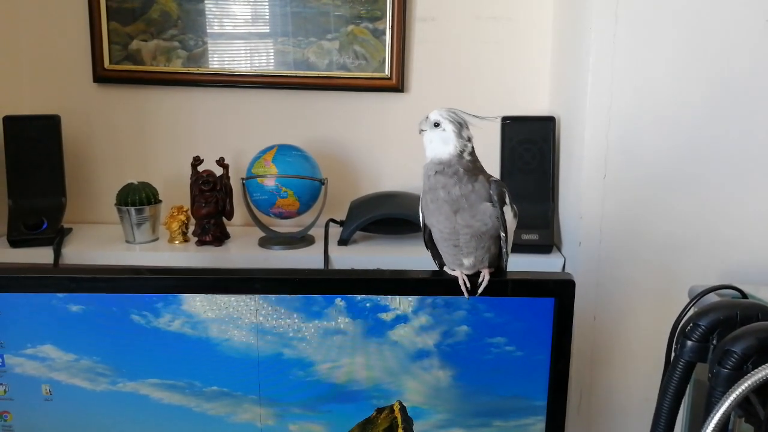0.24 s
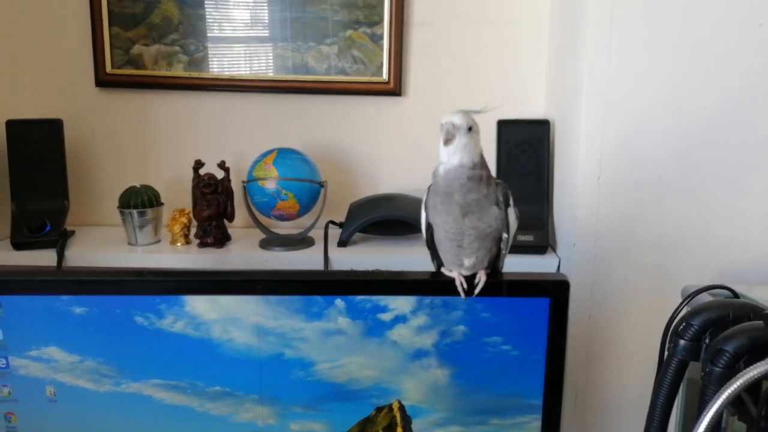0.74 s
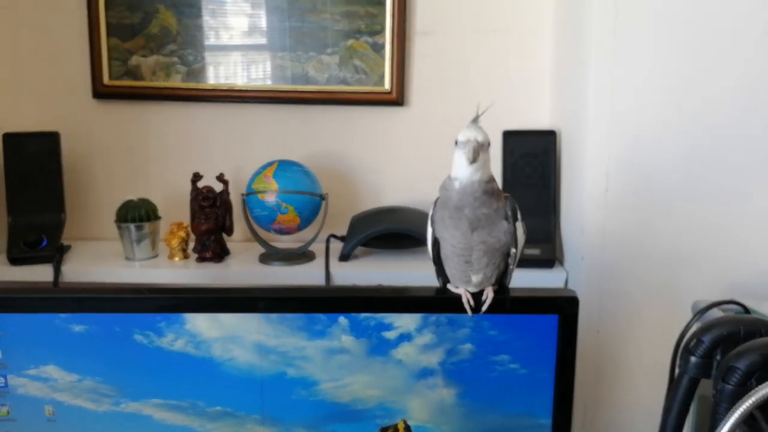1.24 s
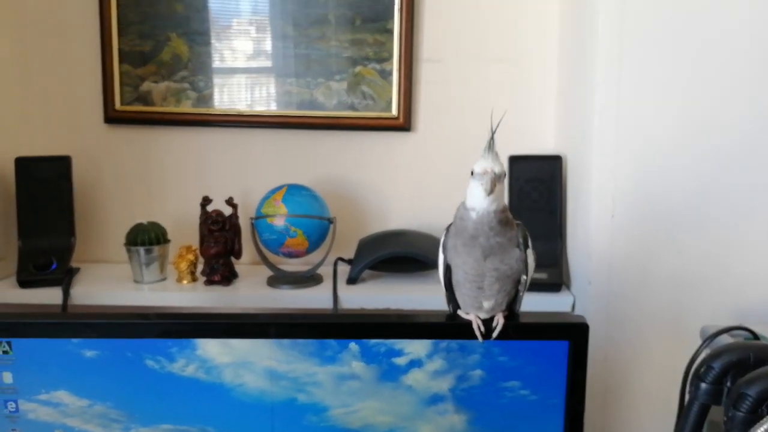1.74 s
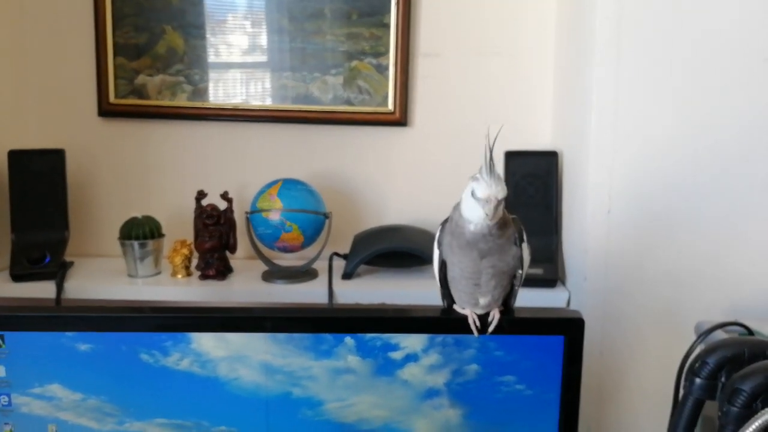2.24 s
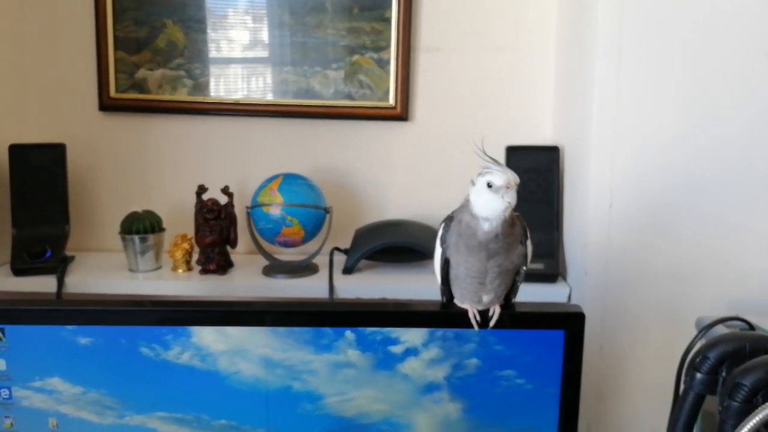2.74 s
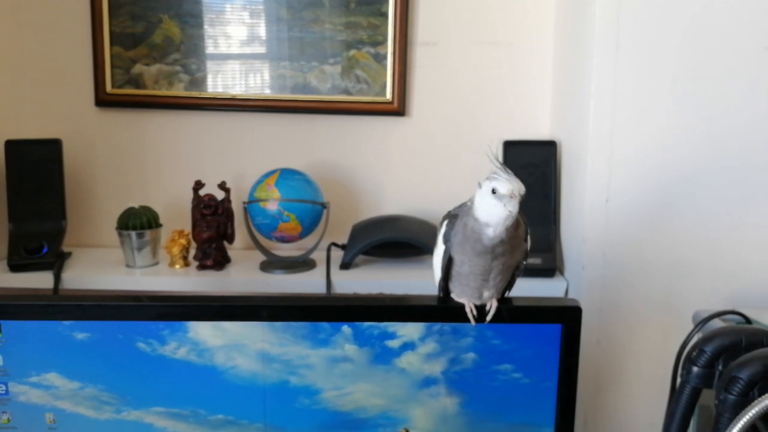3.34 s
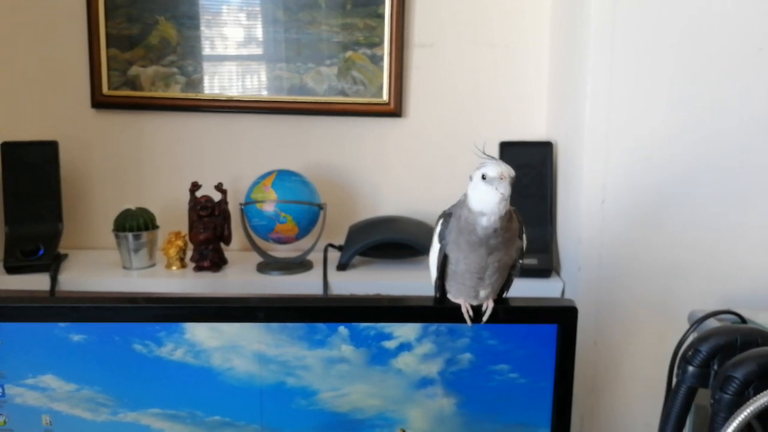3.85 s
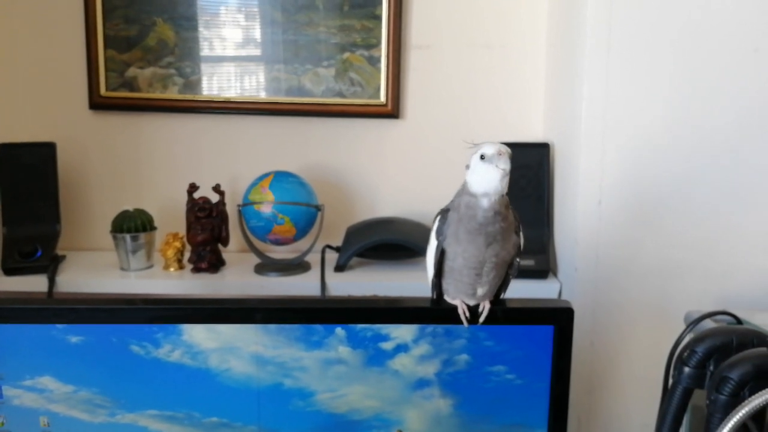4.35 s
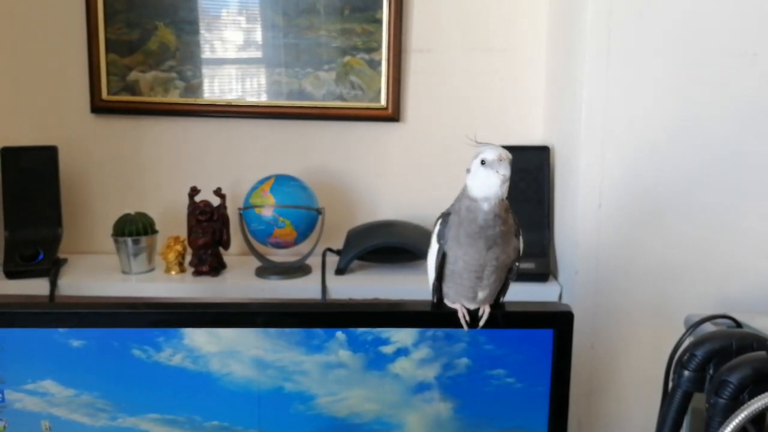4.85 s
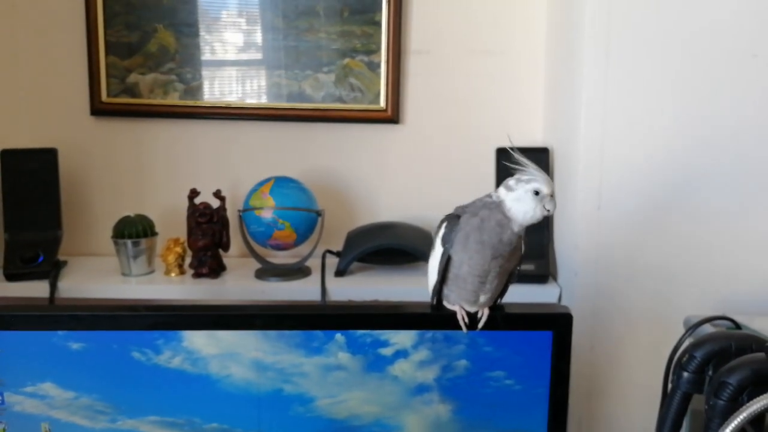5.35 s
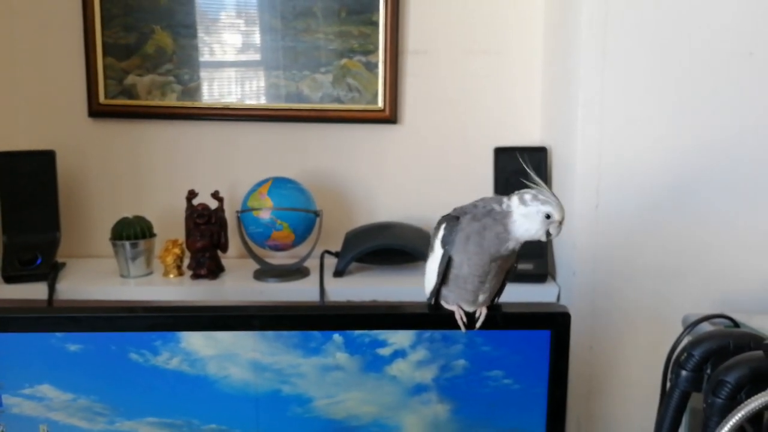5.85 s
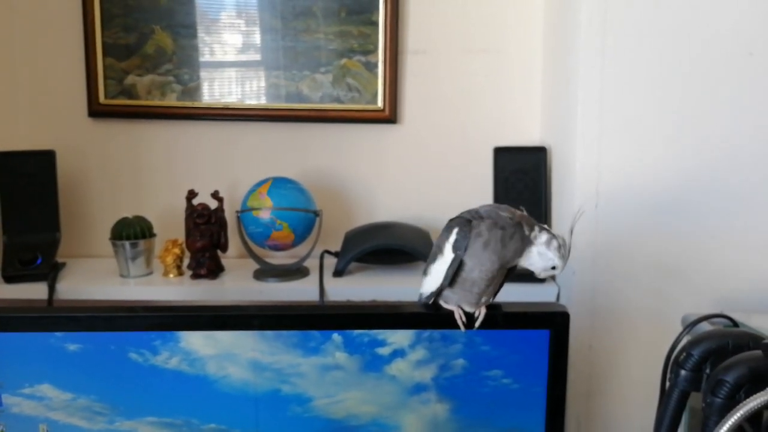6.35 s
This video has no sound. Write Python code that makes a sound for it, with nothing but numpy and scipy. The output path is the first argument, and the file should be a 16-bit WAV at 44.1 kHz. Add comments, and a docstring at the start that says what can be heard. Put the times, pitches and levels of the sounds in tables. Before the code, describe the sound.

A cockatiel sings in a small, quiet room with short, bright reflections, heard fairly close in stereo. At 0 s a falling slurred whistle, a chirp and a soft raspy note end a phrase already under way; from 0.4 to 0.7 s a long whistle climbs, swells purely and falls, followed by a husky, airy hiss until about 1.05 s. A pause leaves low mains hum, soft air, dull bumps and tiny dry rustles near 1.3 to 1.5 s. At 2.1 s a soft low call leads into loud bright cries at 2.4 s, then rapid chirps, hoarse notes and downward slurs until 4 s. Another long whistle at 4.1 to 4.4 s closes with a fading hiss to 4.8 s. The hum is thinner after 2.2 s. Quiet follows; a soft call at 5.5 s and cries from 5.8 s open a third phrase, chirping and slurring until the end around 6.6 s.

```python
"""A small, quiet room: a perched cockatiel ends one warbling phrase, sings a second and starts a third.
Each note is a gliding whistle with throat-coloured overtones, now pure, now bright or raspy.
A phrase closes with a husky hiss, noise in two throat resonances that rise and fall.
Echoes and a short tail answer; wavering sines hum, noise makes the air, dull swells and rustles."""
import sys
import numpy as np
from scipy import signal
from scipy.fft import rfft, irfft
from scipy.io import wavfile
from scipy.ndimage import uniform_filter1d, minimum_filter1d

SR = 44100
rng = np.random.default_rng(int(sys.argv[2]) if len(sys.argv) > 2 else 0)


def generate_wav(signal):
    """Clip the signal to [-1, 1] and save it as 16-bit WAV at the path in sys.argv[1]."""
    frames = np.transpose(np.atleast_2d(signal))
    scaled = np.clip(frames, -1, 1) * 32767
    pcm = np.round(scaled).astype(np.int16)
    wavfile.write(sys.argv[1], SR, pcm)


N = 291501

# jitter: rms share of the pitch; air: fizz relative to the overtones
HOARSE_JITTER, HOARSE_AIR_DB = 0.007, -12


def amp(db):
    """Decibels to gain."""
    return 10 ** (np.asarray(db) / 20)


def unit(x):
    """Scales to rms 1."""
    return x / np.sqrt(np.mean(x ** 2) + 1e-20)


def read(points, hz):
    """Every column of a spectrum table at the given frequencies, interpolated over log frequency."""
    f, *columns = np.transpose(points)
    return [np.interp(np.log(hz + 1), np.log(f), c) for c in columns]


def noise(colour, size=N):
    """Noise of rms 1 with the given spectrum."""
    db, = read(colour, np.fft.rfftfreq(size, 1 / SR))
    return unit(irfft(rfft(rng.standard_normal(size)) * amp(db), size))


def wobble(size, hz, order=4):
    """Random motion of rms 1, low-passed at hz."""
    lowpass = signal.butter(order, hz, fs=SR, output="sos")
    settled = signal.sosfilt(lowpass, rng.standard_normal(2 * size))[size:]
    return unit(settled)


def band(hz, width_hz, order):
    """Noise of about rms 1 that reaches width_hz to either side of the curve hz."""
    phase = 2 * np.pi * np.cumsum(hz) / SR
    in_phase = wobble(len(hz), width_hz, order) * np.cos(phase)
    return in_phase + wobble(len(hz), width_hz, order) * np.sin(phase)


def radiated(x, edge_hz):
    """High-pass: small things give off and throw back little below edge_hz."""
    return signal.sosfilt(signal.butter(3, edge_hz, "high", fs=SR, output="sos"), x)


def add(mix, start_s, sound):
    """Adds a sound into the mix at start_s."""
    part = mix[..., max(round(start_s * SR), 0):][..., :sound.shape[-1]]
    part += sound[..., :part.shape[-1]]


def background(hum_stop_s=2.19, apart=0.28, hum_side_db=1, air_db=-66.5, rush_db=4):
    """Slightly wavering mains hum, part of which dies away, over the still air of the room."""
    # hum lines: (frequency [Hz], steady peak level [dB], peak level of the share that stops [dB])
    hum_lines = [(49, -58.5, -66), (100, -68, -67), (149, -76, -84), (200, -69.5, -53), (300.5, -80, -61.5)]
    # spectrum of the air: (frequency [Hz], relative level per Hz [dB])
    air_colour = [(30, 2), (70, 1), (160, -2), (400, -8), (1800, -17), (4000, -26), (10500, -30),
                  (15000, -44)]
    t = np.arange(N) / SR
    running = np.clip((hum_stop_s - t) / 0.08 + 0.5, 0, 1)
    hum = np.zeros(N)
    for hz, steady_db, stopping_db in hum_lines:
        level = amp(steady_db) + running * amp(stopping_db)
        phase = 2 * np.pi * hz * t + 0.15 * wobble(N, 6)
        hum += level * (1 + 0.16 * wobble(N, 6)) * np.sin(phase)
    shared = noise(air_colour)
    air = np.array([unit(shared + apart * noise(air_colour)) for side in range(2)])
    # more air rushes while the louder hum runs
    return hum * amp([[hum_side_db], [-hum_side_db]]) + amp(air_db + rush_db * running) * air


def dull_swells(width_hz=190):
    """Soft, dull noise swells: a faint breathy murmur, an undertone below the first hiss, room noises."""
    # (start [s], length [s], centre [Hz], crest level [dB])
    swells = [(0.252, 0.22, 1000, -48.5), (0.883, 0.17, 1000, -52.5), (1.226, 0.18, 650, -55.5),
              (1.419, 0.28, 782, -65), (1.717, .13, 715, -59.5), (2.316, 0.12, 516, -58.5)]
    out = np.zeros(N)
    for start_s, length_s, hz, level_db in swells:
        window = signal.windows.hann(round(length_s * SR))
        add(out, start_s, amp(level_db) * window * band(np.full(len(window), hz), width_hz, order=3))
    return out


def ducking(x, threshold_db=-23, share=0.45, recovery_db_per_s=34):
    """Gain that drops as the 9 ms power of x grows loud, then recovers as a falling peak level."""
    power_db = 10 * np.log10(abs(uniform_filter1d(x ** 2, size=400)) + 1e-12)
    fall_db = np.arange(N) * recovery_db_per_s / SR
    held_db = np.maximum.accumulate(power_db + fall_db) - fall_db
    return amp(-share * np.maximum(held_db - threshold_db, 0))


def rustles():
    """Small dry puffs as the bird shifts on its perch: noise with a quick rise and exponential decay."""
    # (start [s], level before decay [dB], rise [s], decay [s])
    puffs = [(1.256, -54.5, 0.021, 0.057), (1.434, -49, 0.0017, 0.054)]
    # spectrum of the puffs: (frequency [Hz], relative level [dB])
    puff_colour = [(1100, -14), (1700, 0), (3500, -16), (4000, -2), (4400, -16), (14000, -40)]
    t = np.arange(N) / SR
    level = np.zeros(N)
    for start_s, level_db, rise_s, decay_s in puffs:
        rise = np.clip((t - start_s) / rise_s, 0, 1)
        level += amp(level_db) * rise * np.exp(-np.maximum(t - start_s - rise_s, 0) / decay_s)
    return level * noise(puff_colour)


def hiss(rows, low_width_hz=400, wide_hz=560, narrow_hz=280, high_db=-17, coupling_db=12,
         skirt_width_hz=2200, skirt_db=-22, gap_hz=3180, gap_width_hz=330):
    """Husky whistle: turbulence in two throat resonances that move with the beak, a still gap between."""
    s, *columns = np.transpose(rows)
    t = np.arange(s[0], s[-1], 1 / SR)
    level_db, low_hz, high_hz = (np.interp(t, s, c) for c in columns)
    # the upper resonance grows and narrows as its pitch falls towards the lower one
    nearness = (high_hz.max() - high_hz) / np.ptp(high_hz)
    upper = np.sqrt(1 - nearness) * band(high_hz, wide_hz, order=4)
    upper += np.sqrt(nearness) * band(high_hz, narrow_hz, order=4)
    air = band(low_hz, low_width_hz, order=6) + amp(high_db + coupling_db * nearness) * upper
    air += amp(skirt_db) * radiated(band(low_hz, skirt_width_hz, order=2), 1170)
    air = signal.lfilter(*signal.iirnotch(gap_hz, gap_hz / gap_width_hz, fs=SR), air)
    return amp(level_db) * air * signal.windows.tukey(len(t), 0.1)


def bend(u, first_hz, middle_hz, last_hz):
    """One smooth bend of pitch as u runs from 0 to 1."""
    line = first_hz + (last_hz - first_hz) * u
    return line + (2 * middle_hz - first_hz - last_hz) * 2 * u * (1 - u)


def swell(u, crest, edge_db):
    """Parabola in dB: 0 at the crest, edge_db half a note away."""
    return edge_db * (2 * (u - crest)) ** 2


def note(hz, level_db, overtone_db, rasp, doubling, jitter, tilt_db, air_db, rasp_jitter=0.15,
         rasp_hz=720, flutter_db=4.5, shake_db=10, fizz_db=-27, lower_half_db=-30,
         lurch_db=7, lurch_bend=0.07, lurch_hz=60, fits_db=1.2):
    """One whistle of the syrinx: a gliding tone, its overtones coloured by the throat and tilted per octave."""
    # throat and beak colour before the tilt: (frequency [Hz], level [dB])
    throat = [(2600, 18), (3200, 15.5), (3900, 7), (4700, 5.5), (5200, -1), (6000, 2.5), (6600, -7),
              (7400, -8), (8500, -14), (9700, -12), (11000, -20), (12400, -17), (14000, -29.5)]
    # breathy fizz: (frequency [Hz], relative level [dB])
    fizz_colour = [(1500, -4), (2800, 7), (4300, -5.5), (5400, -9), (6300, -8.5), (7500, -6), (8700, -16.5),
                   (10500, -15.5), (12000, -16), (14000, -20.5)]
    size = len(hz)
    t = np.arange(size) / SR
    tilted = [(f, db + tilt_db * np.log2(f / throat[0][0])) for f, db in throat]

    # the membranes beat less evenly when the voice rasps
    hz = hz * (1 + lurch_bend * rasp * wobble(size, lurch_hz))
    uneven = 1 + jitter * wobble(size, 150) + rasp_jitter * rasp * wobble(size, 400)
    phase = 2 * np.pi * np.cumsum(hz * uneven) / SR

    k = np.arange(2, 12)[:, None]
    weights = amp(read(tilted, k * hz)[0]) * (k * hz < SR / 2)
    overtones = (weights * np.sin(k * phase)).sum(0) / np.linalg.norm(weights, axis=0)
    overtones += amp(air_db) * noise(fizz_colour, size=size)
    tone = np.sin(phase) + amp(overtone_db + flutter_db * wobble(size, 75)) * overtones
    # strong and weak cycles alternate: half lines, the upper one louder
    tone += doubling * (0.5 * np.sin(1.5 * phase) + amp(lower_half_db) * np.sin(phase / 2))

    # uneven fits of chaotic cycles spread noise around each line and add fizz
    fits = rasp * unit(amp(fits_db * wobble(size, 240)))
    fizz = noise(fizz_colour, size=size) * signal.windows.tukey(size, 0.5)
    tone = tone * (1 + fits * wobble(size, rasp_hz)) + amp(fizz_db) * fits * fizz
    level_db = level_db + rasp * (shake_db * wobble(size, 190) + lurch_db * wobble(size, lurch_hz))
    gate = np.clip(np.minimum(t, t[-1] - t) / 0.004, 0, 1)  # 4 ms fades
    gated = tone * np.sin(np.pi / 2 * gate) ** 2
    return np.sqrt(2) * amp(level_db) * radiated(gated, 210)


def low_call(length_s, pitch_hz, level_db, overtone_db, catch=0.18, catch_s=0.0061, catch_db=4,
             sag_hz_per_s=700, waver=0.016, waver_hz=14, end_doubling=0.38):
    """A soft call that catches high, settles at once, wavers and sags; its cycles double more and more."""
    t = np.arange(0, length_s, 1 / SR)
    onset, u = np.exp(-t / catch_s), t / length_s
    motion = 1 + catch * onset - waver * np.sin(2 * np.pi * waver_hz * t)
    hz = pitch_hz * motion - sag_hz_per_s * t
    return note(hz, level_db + catch_db * onset + swell(u, crest=0.19, edge_db=0.5),
                overtone_db + swell(u, crest=0.58, edge_db=-8.5), rasp=0.025,
                doubling=end_doubling * u, jitter=0.004, tilt_db=0.5, air_db=-14)


def raspy(length_s, first_hz, middle_hz, last_hz, level_db, overtone_db, rasp, doubling):
    """A hoarse note that bends around one pitch, brightest past its middle."""
    u = np.linspace(0, 1, round(length_s * SR))
    return note(bend(u, first_hz, middle_hz, last_hz), level_db + swell(u, crest=0.46, edge_db=-0.5),
                overtone_db + swell(u, crest=0.62, edge_db=-11), rasp, doubling,
                HOARSE_JITTER, tilt_db=2.5, air_db=HOARSE_AIR_DB)


def slur(length_s, high_hz, low_hz, tip_after_s, tip_s, level_db, overtone_db, rasp, steady_share=0.25):
    """A held high pitch tips over into a low one, and the voice breaks up as it does."""
    u = np.linspace(0, 1, round(length_s * SR))
    tipped = 0.5 + 0.5 * np.tanh((u * length_s - tip_after_s) / (2 * tip_s))
    rasp = rasp * (steady_share + (1 - steady_share) * np.sqrt(tipped))
    hz = high_hz + (low_hz - high_hz) * tipped
    return note(hz, level_db + swell(u, crest=0.4, edge_db=-1.5), overtone_db, rasp,
                doubling=0.12, jitter=HOARSE_JITTER, tilt_db=-5.0, air_db=HOARSE_AIR_DB)


def chirp(length_s, first_hz, middle_hz, last_hz, level_db, overtone_db,
          brighten_db=5, end_rasp=0.26, flick=0.027, flick_s=0.0034):
    """A short glide that brightens as it goes and stops with a rough downward flick."""
    u = np.linspace(0, 1, round(length_s * SR))
    ending = np.exp((u - 1) * length_s / flick_s)
    hz = bend(u, first_hz, middle_hz, last_hz) * (1 - flick * ending)
    return note(hz, level_db + swell(u, crest=0.51, edge_db=-6.5), overtone_db + brighten_db * (u - 0.5),
                rasp=0.0072 + end_rasp * ending, doubling=0, jitter=0.007, tilt_db=1.5, air_db=-16)


def cry(length_s, first_hz, middle_hz, last_hz, level_db, overtone_db,
        drop=0.15, drop_s=0.0055, clean_rasp=0.005, end_rasp=0.13):
    """A bright arch that drops and frays as the push ends; the fundamental swells more than the overtones."""
    u = np.linspace(0, 1, round(length_s * SR))
    ending = np.exp((u - 1) * length_s / drop_s)
    hz = bend(u, first_hz, middle_hz, last_hz) * (1 - drop * ending)
    body_db = swell(u, crest=0.5, edge_db=-14.0)
    shine_db = swell(u, crest=0.27, edge_db=2.0)
    return note(hz, level_db + body_db, overtone_db + shine_db - body_db, clean_rasp + end_rasp * ending,
                doubling=0, jitter=0.0019, tilt_db=-1.13, air_db=-41.5)


def whistle(rows, crack=0.18, crack_s=0.079):
    """The long whistle and its left-right balance; the voice cracks into period doubling as it dies."""
    s, *columns = np.transpose(rows)
    t = np.arange(s[0], s[-1], 1 / SR)
    hz, level_db, overtone_db, rasp, side_db = (np.interp(t, s, c) for c in columns)
    doubling = crack * np.clip(2 * (t - s[-1] + crack_s) / crack_s, 0, 1)
    sound = note(hz, level_db, overtone_db, rasp, doubling, jitter=0.001, tilt_db=1.0, air_db=-22.5)
    return sound, side_db


def song():
    """Every note as (start s, sound, left minus right dB, which shifts with the reflections near the perch)."""
    # Levels are bases for the swells; overtones are relative to the fundamental; side is left minus right.
    # loud, bright cries that open a phrase: (start [s], length [s], first [Hz], middle [Hz], last [Hz],
    # level [dB], overtones [dB], side [dB])
    cries = [(2.397, 0.1, 1738, 1999, 1952, -13.5, -12.5, 4.5),
             (2.539, 0.056, 1920, 2371, 2382, -12.5, -10, -1.5),
             (2.659, 0.042, 1687, 1823, 1765, -23, -3.5, 6.5),
             (5.832, 0.11, 1757, 2016, 1795, -15.5, -11, 9.5),
             (5.972, .058, 1821, 2248, 2232, -14, -8.5, 1), (6.089, 0.045, 1556, 1807, 1584, -22, -8, 8.5)]
    # short, nearly pure chirps: columns as the cries
    chirps = [(0.118, 0.038, 1633, 1578, 1512, -19.5, -21.5, -3),
              (2.778, 0.046, 1396, 1587, 1703, -20.5, -21, 5.5),
              (3.171, 0.037, 1557, 1572, 1482, -19, -28, 7), (3.285, 0.044, 1470, 1635, 1573, -18, -26, 8),
              (3.418, 0.043, 1472, 1696, 2190, -18.5, -24, 7.5),
              (3.827, 0.041, 1578, 1618, 1689, -17, -19.5, 7),
              (3.935, 0.047, 1369, 1402, 1340, -23.5, -18, 1.5),
              (6.211, 0.047, 1363, 1654, 1788, -20, -27, 2.5)]
    # raspy notes around one pitch: (start [s], length [s], first [Hz], middle [Hz], last [Hz],
    # level [dB], overtones [dB], rasp [0-1], period doubling [0-1], side [dB])
    rasps = [(0.244, 0.044, 1391, 1378, 1394, -33, -15.5, 0.2, 0.44, -4),
             (2.921, 0.082, 1966, 1862, 2030, -25, -24, .16, 0, 1.5),
             (3.562, .091, 1933, 1707, 1954, -25.5, -21.5, 0.14, 0.4, 4.5),
             (6.36, 0.091, 2202, 2226, 2160, -26.5, -26, 0.3, 0, -1)]
    # slurs from high to low: (start [s], length [s], high [Hz], low [Hz], tips after [s], tipping time [s],
    # level [dB], overtones [dB], rasp [0-1], side [dB])
    slurs = [(0, .046, 2560, 1890, 0.037, 0.0016, -18, -26.5, 0.23, 5),
             (3.046, 0.071, 2440, 1515, 0.036, 0.0079, -28.5, -26.5, 0.21, 0.5),
             (3.7, .071, 2210, 1538, 0.029, 0.012, -22.5, -26.5, 0.08, 4.5),
             (6.51, 0.061, 2430, 1645, 0.02, 0.0049, -22, -22.5, 0.05, 1)]
    # soft calls that announce a phrase: (start [s], length [s], pitch [Hz], level [dB], overtones [dB],
    # side [dB])
    low_calls = [(2.101, .108, 1334, -35, -14.5, 2), (5.537, .131, 1352, -33, -16, 4)]
    # long whistles, a raspy climb, a pure swell and a fall: (time [s], pitch [Hz], level [dB],
    # overtones [dB], rasp [0-1], side [dB])
    whistles = [
        [(.364, 1311, -31, -16, 0.19, -5), (.396, 1355, -27, -22, 0.01, -5.5),
         (.437, 1700, -21.5, -23, 0.15, 7), (.457, 2000, -24, -29, 0.13, 2.5), (.503, 1946, -23, -34.5, .08, 6),
         (.547, 1919, -10, -36, 0, 16.5), (.603, 1947, -11.5, -33.5, 0, 10), (.63, 1842, -28.5, -14, 0, -1.5),
         (.687, 1506, -20.5, -24, 0.02, 2.5)],
        [(4.072, 1286, -32, -14, 0.07, -4.5), (4.125, 1583, -19, -31, 0, 6), (4.157, 2022, -22.5, -24, 0.13, 1),
         (4.184, 1793, -32, -41, 0.4, 1.5), (4.213, 1755, -29, -17.5, 0.11, 1.5),
         (4.257, 1877, -10, -32, 0, 11.5), (4.306, 2016, -18.5, -26.5, 0, -2.5),
         (4.334, 1804, -32, -25, 0.18, 0.5), (4.377, 1194, -33.5, -7, 0.09, -1)],
    ]
    kinds = [(low_call, low_calls), (raspy, rasps), (slur, slurs), (chirp, chirps), (cry, cries)]
    notes = []
    for sing, table in kinds:
        for start_s, *shape, side_db in table:
            notes.append((start_s, sing(*shape), side_db))
    for rows in whistles:
        notes.append((rows[0][0], *whistle(rows)))
    return notes


def shelf(x, edge_hz=2200):
    """Shelf and wall behind the perch throw the overtones back, a little differently to each ear."""
    # first echoes: (delay to the left ear [s], delay to the right ear [s], level [dB])
    echoes = [(.0003, 0.0005, -14.5), (.0024, .0019, -14.5), (.0058, 0.0054, -11.5)]
    bright, out = radiated(x, edge_hz), np.zeros((2, N))
    for left_s, right_s, level_db in echoes:
        add(out[0], left_s, amp(level_db) * bright)
        add(out[1], right_s, amp(level_db) * bright)
    return out


def room(x, first_s=0.011, taps_per_s=4000):
    """Dense reflections of random sign, other ones for each ear, each band dying at its own speed."""
    # the tail: (frequency [Hz], total level [dB], time to fall 60 dB [s])
    tail_bands = [(1800, -7, 0.35), (2660, -6, 0.46), (3550, -6, 0.45), (5430, -10, 0.46),
                  (13000, -3, 0.06)]
    signs = rng.choice([-1., 1.], (2, SR))
    taps = signs * (rng.random((2, SR)) < taps_per_s / SR) * (np.arange(SR) > first_s * SR)
    hz, t, z = signal.stft(taps / np.linalg.norm(taps[0]), SR, nperseg=256)
    level_db, t60_s = (c[:, None] for c in read(tail_bands, hz))
    decay = np.log(1000) / t60_s
    # sqrt(2 * decay) keeps a band's energy independent of its decay time
    envelope = amp(level_db) * np.sqrt(2 * decay) * np.exp(-decay * t)
    tail = signal.istft(z * envelope, SR)[1]
    return signal.fftconvolve(x[None], tail, axes=1)[:, :N]


def scene():
    """The bird with its room; its loud notes push the hum, air and dull swells down for a moment."""
    # the hisses: (time [s], level [dB], lower resonance [Hz], upper resonance [Hz])
    hisses = [
        [(.765, -45.5, 1776, 3590), (.825, -32.5, 2676, 4987), (.88, -26.5, 2783, 5224),
         (.95, -39.5, 2240, 3550), (1.05, -49, 1845, 3540)],
        [(4.45, -51, 1937, 3536), (4.505, -32.5, 2412, 4670), (4.555, -31, 2645, 5150),
         (4.625, -40, 2322, 3657), (4.79, -60, 1694, 3520)],
    ]
    voice, direct = np.zeros(N), np.zeros((2, N))
    for start_s, sound, side_db in song():
        sides = amp(np.vstack([side_db / 2, -side_db / 2]))
        add(voice, start_s, sound)
        add(direct, start_s, sound * sides / np.sqrt(np.mean(sides ** 2, axis=0)))
    husky = rustles()
    for rows in hisses:
        add(husky, rows[0][0], hiss(rows))
    direct += husky
    # the bird sits right of the middle: its sound reaches the left ear 4 samples later
    direct[0] = np.pad(direct[0], (4, 0))[:N]
    reflected = shelf(voice + husky) + room(voice + 2 * husky)
    return direct + reflected + (background() + dull_swells()) * ducking(voice)


def record(dry, roll_off_hz=12300, ceiling=0.77, edge_hz=15250):
    """The microphone loses the highest treble, a quick limiter holds down the peaks; then the band limit."""
    dull = signal.sosfilt(signal.butter(6, roll_off_hz, fs=SR, output="sos"), dry)
    gain = 1 / np.maximum(abs(dull).max(0) / ceiling, 1)
    limited = dull * uniform_filter1d(minimum_filter1d(gain, size=301), size=301)
    band_limit = signal.firwin(511, edge_hz, window=("kaiser", 9), fs=SR)
    return signal.oaconvolve(limited, band_limit[None], "same")


dry = scene()
out = record(dry)
generate_wav(out)
```